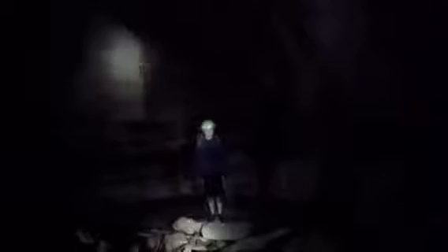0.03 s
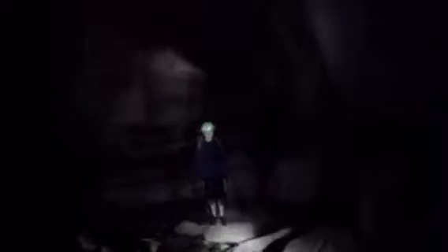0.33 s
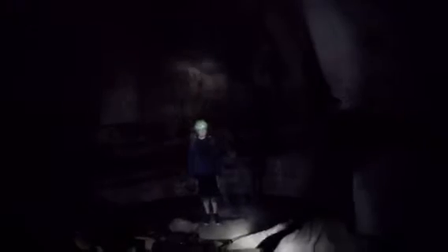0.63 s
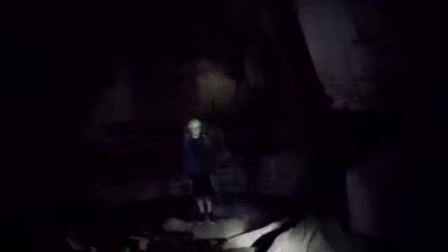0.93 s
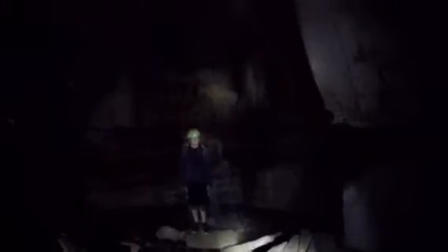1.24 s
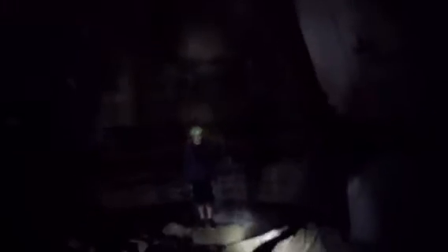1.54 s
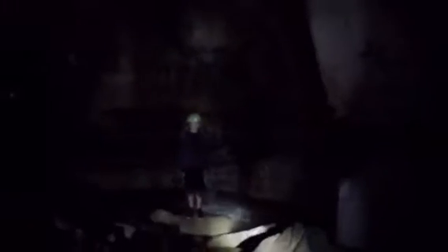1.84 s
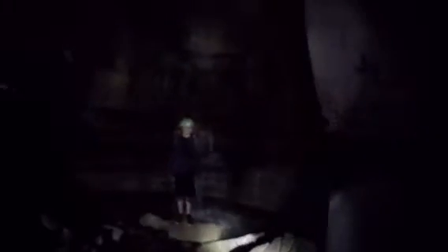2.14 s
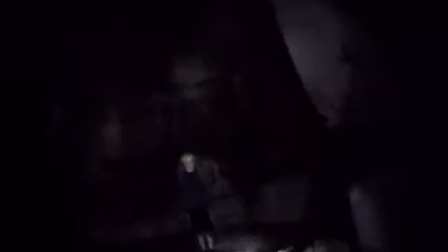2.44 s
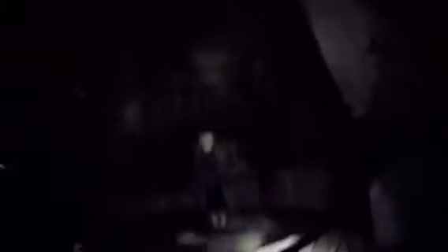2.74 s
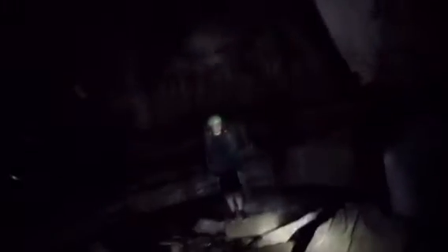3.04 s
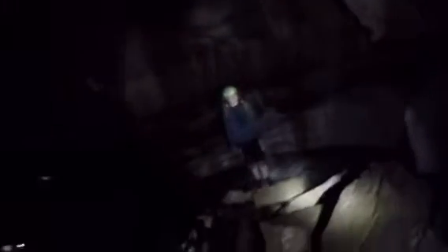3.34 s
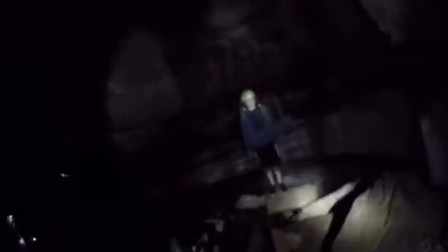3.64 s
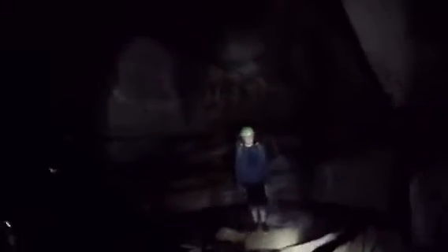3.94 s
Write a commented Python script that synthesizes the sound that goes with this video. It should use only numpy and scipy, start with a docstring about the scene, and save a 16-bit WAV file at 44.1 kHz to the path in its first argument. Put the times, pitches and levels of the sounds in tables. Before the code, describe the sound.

A stream rushes through a rock cave with a steady roar and hissing spray.

```python
"""A large cave with a stream rushing through: a steady roar of coloured noise with gurgles and a hiss
of spray, and small ringing bubbles blurred by the rock chamber's reverb. The water fades in after a
faint tick. Underneath, a low rumble with a few soft bumps dies away over two seconds; a thin fizz joins
at the very top. Near the end the mono roar brightens and opens out to both sides."""
import sys
import numpy as np
from scipy import signal
from scipy.fft import rfft, irfft
from scipy.io import wavfile

SR = 44100
rng = np.random.default_rng(int(sys.argv[2]) if len(sys.argv) > 2 else 0)


def store_wav(level_fs):
    """Save 16-bit WAV to argv[1]."""
    pcm = np.round(np.clip(np.atleast_2d(level_fs), -1, 1) * 32767)
    wavfile.write(sys.argv[1], SR, pcm.T.astype(np.int16))


N = 176400
T = np.arange(N) / SR
HOP = 256
FRAME_S, BIN_HZ = np.arange(N // HOP + 5) * HOP / SR, np.fft.rfftfreq(4 * HOP, 1 / SR)

# tone of the rumble (frequency [Hz], relative level [dB])
RUMBLE_EQ = [(10, -17), (28, 1), (50, -1.5), (75, -3), (115, -4.5), (170, -16), (400, -65)]
# fader ride of the rumble (time [s], level [dB])
RUMBLE_FADER = [(.16, -77), (.25, -53), (.31, -40), (.55, -36), (1, -40), (1.3, -46), (1.75, -51),
                (2.2, -51), (2.4, -57), (2.9, -65), (4, -68)]
# soft low bumps (time [s], pitch [Hz], half-length [s], peak level [dB])
LOW_BUMPS = [(0.818, 52, 0.027, -28), (1.077, 77.6, 0.012, -26), (1.447, 41.7, 0.021, -34),
             (2.137, 50, .015, -44), (2.243, 100, .015, -41)]
# tone of the fizz (frequency [Hz], relative level [dB])
FIZZ_EQ = [(6710, -38), (11400, -6), (12300, -2), (12900, 0), (15200, -6.5)]
# fader ride of the fizz (time [s], level [dB])
FIZZ_FADER = [(.25, -84), (.5, -70), (.95, -62), (1.1, -54), (1.25, -43.5), (3.6, -42), (4, -43)]
# tone of the rushing water (frequency [Hz], relative level [dB])
ROAR_EQ = [(100, -9.5), (160, -1.2), (205, -2), (240, -2), (270, 0.2), (310, -3.5), (345, -1.5),
           (410, -2.5), (500, -0.5), (760, 0.55), (950, -1), (1250, -1), (1550, -4), (1800, -3.5),
           (2400, -5.5), (3150, -8), (3500, -6), (3800, -3.5), (4250, -2.5), (4900, -5), (5500, -6),
           (6500, -10), (7500, -12), (8500, -17), (9250, -18.5), (10200, -24), (11500, -35)]
# water's fade-in, read against FULL_FLOW_DB (time [s], bass [dB], body [dB], hiss [dB], spray [dB])
FLOW_FADE_IN = [(.15, -75, -73, -66, -77), (.175, -61, -50, -48, -66), (.228, -50, -40, -38.5, -56.5),
                (.284, -32.5, -35, -35, -51.5), (.335, -27, -30.5, -31, -49.5), (.49, -28, -27, -27, -39.5),
                (.74, -27.5, -25.5, -26.5, -35), (.95, -28.5, -25, -24, -35)]
# surges that ring in the cave (time [s], half-length [s], centre [Hz], half-width [octaves], boost [dB])
WATER_SURGES = [(1.033, 0.1, 160, 0.17, 12), (1.22, 0.11, 265, .15, 10), (1.398, .05, 450, .4, 5),
                (1.92, .08, 770, 0.95, 2.5), (2.63, 0.065, 560, 0.27, 4.5), (3.0, 0.055, 513, .1, 3),
                (3.3, 0.31, 503, 0.27, 3)]
# width of the fully open roar (frequency [Hz], side against mid [dB])
OPEN_SIDE_EQ = [(100, -44), (380, -26), (700, -10), (1280, -4), (2350, -4), (4300, -8.5), (5500, -0.5),
                (9000, -1)]
# brightening of the fully open roar (frequency [Hz], gain [dB])
OPEN_EQ = [(300, 0.5), (1000, -1.2), (2000, .5), (4000, 1.5), (5200, -1.5), (6000, 3.5), (7400, 3.5),
           (8300, 0), (11000, 1.5)]

# the water's bands: bass, body, hiss, spray
BAND_HZ, FULL_FLOW_DB = (400, 1200, 3800, 8500), (-27.5, -24.5, -24.5, -33.5)
START_S, OPENS_AT_S, OPENING_S = .156, 3.478, 0.43
GURGLE_DB, CHURN_DB, FLICKER_DB, SWELL_DB = 0.7, .5, 0.09, 0.01


def amp(db):
    """Decibels to gain."""
    return 10 ** (np.asarray(db) / 20)


def unit(x):
    """Scales to rms 1."""
    return x / np.sqrt(np.mean(x ** 2) + 1e-20)


def eq_db(points, hz):
    """Reads an EQ curve on a log-frequency axis."""
    freqs, levels = np.transpose(points)
    return np.interp(np.log(hz + 1), np.log(freqs + 1), levels)


def fader(points):
    """Gain per sample from a level curve."""
    return amp(np.interp(T, *np.transpose(points)))


def noise(colour):
    """Steady noise of rms 1, coloured by a function of frequency."""
    return unit(irfft(rfft(rng.standard_normal(N)) * colour(np.fft.rfftfreq(N, 1 / SR)), N))


def patches(span_s, span_hz):
    """A smooth random field over time and frequency, rms 1."""
    shape = len(FRAME_S), len(BIN_HZ)
    per_s = np.fft.fftfreq(len(FRAME_S), HOP / SR)[:, None]
    per_hz = np.fft.rfftfreq(len(BIN_HZ), BIN_HZ[1])
    blur = np.exp(-(per_s * span_s) ** 2 - (per_hz * span_hz) ** 2)
    return unit(np.fft.irfft2(np.fft.rfft2(rng.standard_normal(shape)) * blur, shape))


def moving_eq(x, gain_db):
    """Applies an EQ that changes from frame to frame."""
    frames = dict(nperseg=4 * HOP, noverlap=3 * HOP)
    spectra = signal.stft(x, **frames)[2]
    return signal.istft(spectra * amp(gain_db[:spectra.shape[-1]].T), **frames)[1][..., :N]


def rumble():
    """A bed of low noise that swells and dies away, with soft sine bumps on top."""
    bed = noise(lambda hz: amp(eq_db(RUMBLE_EQ, hz)) * (hz < 400))
    out = bed * fader(RUMBLE_FADER) * np.clip(T / START_S, 0, 1) ** 4
    for at, hz, half_s, db in LOW_BUMPS:
        envelope = amp(db) * np.exp(-((T - at) / half_s) ** 2)
        out += envelope * np.sin(2 * np.pi * (hz * (T - at) + rng.random()))
    return out


def stereo(mid, side):
    """Mid and side to left and right."""
    return np.array([mid + side, mid - side])


def fizz(low_cut_hz=11500, side_db=-3, tick_db=-47, tick_decay_s=.01):
    """A thin, wide hiss at the very top; a quick burst of the same noise makes the opening tick."""
    def colour(hz):
        return amp(eq_db(FIZZ_EQ, hz)) / (1 + (low_cut_hz / np.maximum(hz, 1000)) ** 40)
    hiss = stereo(noise(colour), amp(side_db) * noise(colour))
    tick = amp(tick_db) * np.exp(-np.maximum(T - START_S, 0) / tick_decay_s)
    return hiss * (fader(FIZZ_FADER) + tick) * (T > START_S)


def cave(x, t60_s=0.91, wet_db=-9):
    """Adds the long diffuse tail of the rock chamber."""
    tail = rng.standard_normal(SR) * amp(-60 * T[:SR] / t60_s)
    return x + amp(wet_db) * signal.fftconvolve(x, tail / np.linalg.norm(tail))[:N]


def bubbles(per_s=500, low_hz=350, high_hz=2200, pitches=36, q=9.2, rise=0.096, spread_db=5.5):
    """Many short, slightly rising bubble tones of random strength, blurred by the cave; rms 1."""
    out = np.zeros(N)
    for hz in np.geomspace(low_hz, high_hz, pitches):
        age = np.arange(0, 5, hz / q / SR * np.pi)  # in decay times
        tone = np.sin(2 * q * age * (1 + rise * age / 2))
        ring = tone * np.exp(-age) * (1 - np.exp(-10 * age))
        strength = amp(spread_db * np.minimum(rng.exponential(1, N), 4))
        triggers = rng.random(N) < per_s / pitches / SR
        out += unit(signal.oaconvolve(strength * triggers, ring)[:N])
    return unit(cave(out))


def opening(t):
    """How far the roar has opened out, 0 to 1."""
    return np.clip((t - OPENS_AT_S) / OPENING_S, 0, 1)


def flow_db(gurgle_top_hz=1400):
    """The water's EQ moves: late brightening, fade-in, surges, gurgles, churn and a slight slow swell."""
    gain_db = opening(FRAME_S)[:, None] * eq_db(OPEN_EQ, BIN_HZ)
    times, *band_levels = np.transpose(FLOW_FADE_IN)
    for levels, full_db, solo in zip(band_levels, FULL_FLOW_DB, np.eye(len(BAND_HZ))):
        band = np.interp(np.log(BIN_HZ + 1), np.log(BAND_HZ), solo)
        gain_db += np.interp(FRAME_S, times, levels - full_db, right=0)[:, None] * band
    for at, half_s, hz, octaves, db in WATER_SURGES:
        envelope = np.exp(-((FRAME_S[:, None] - at) / half_s) ** 2)
        bell = np.exp(-(np.log2((BIN_HZ + 1) / hz) / octaves) ** 2)
        gain_db += db * envelope * bell
    gurgle = GURGLE_DB / (1 + (BIN_HZ / gurgle_top_hz) ** 2) * patches(span_s=0.29, span_hz=159)
    churn = CHURN_DB * patches(span_s=0.04, span_hz=700)
    flicker = FLICKER_DB * patches(span_s=0.01, span_hz=9000)
    swell = SWELL_DB * patches(span_s=0.37, span_hz=12000)
    return gain_db + gurgle + churn + flicker + swell


def roar(low_cut_hz=145.3, low_cut_order=13, high_cut_hz=11640):
    """Rushing water as broad noise, steeply cut at both ends; rms 1."""
    def colour(hz):
        low_cut = 1 / np.sqrt(1 + (low_cut_hz / np.maximum(hz, 20)) ** (2 * low_cut_order))
        return amp(eq_db(ROAR_EQ, hz)) * low_cut / (1 + (hz / high_cut_hz) ** 40)
    return noise(colour)


def stream(roar_db=-19.5, bubbles_db=-37.5, attack_s=0.021):
    """Roar and bubbles sit in the centre and follow the flow; a second roar opens the sides late."""
    mid = amp(roar_db) * roar() + amp(bubbles_db) * bubbles()
    side_gain = amp(roar_db + eq_db(OPEN_SIDE_EQ, np.fft.rfftfreq(N, 1 / SR)))
    side = irfft(rfft(roar()) * side_gain, N) * opening(T)
    gate = np.clip(1 + (T - START_S) / attack_s, 0, 1)
    return moving_eq(stereo(mid, side), flow_db()) * gate


def scene():
    """The mix: water up front, fizz above it, rumble below."""
    return stream() + fizz() + rumble()


def record(dry, high_cut_hz=15270):
    """A steep high cut on the whole mix."""
    lowpass = signal.firwin(1023, high_cut_hz, window=("kaiser", 10), fs=SR)
    return signal.oaconvolve(dry, lowpass[None], "same")


dry = scene()
out = record(dry)
store_wav(out)
```